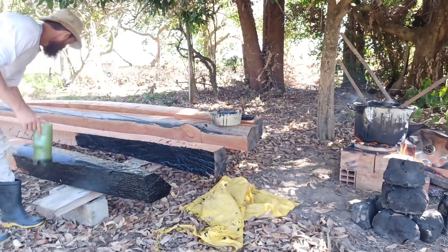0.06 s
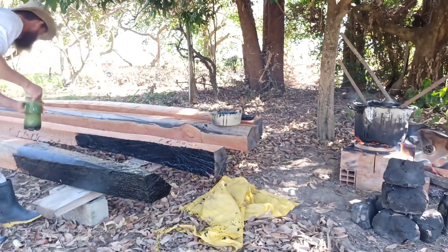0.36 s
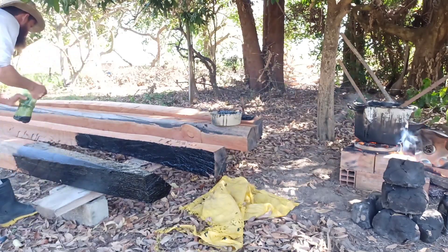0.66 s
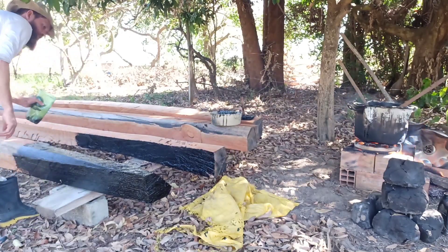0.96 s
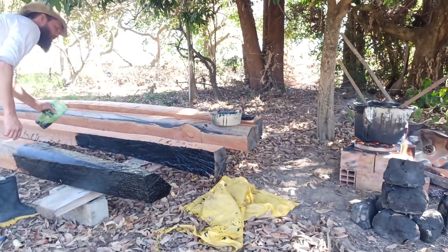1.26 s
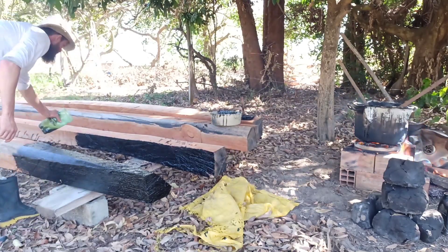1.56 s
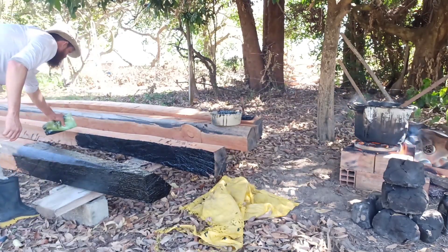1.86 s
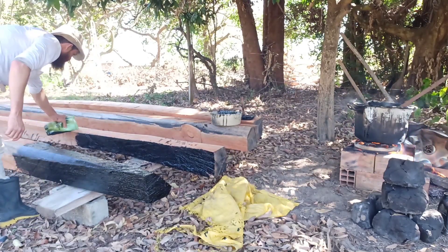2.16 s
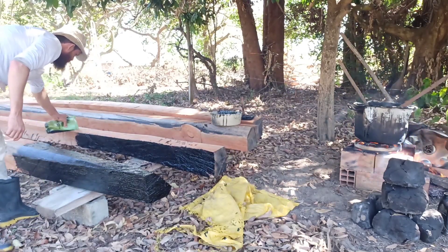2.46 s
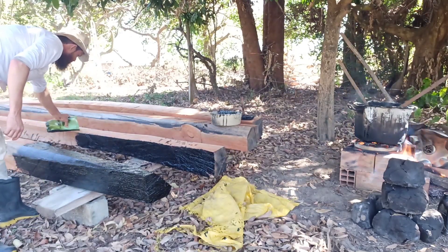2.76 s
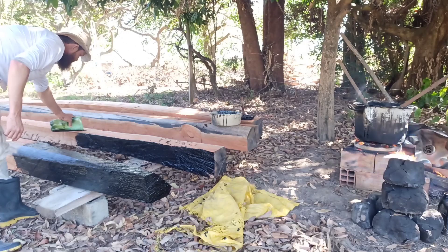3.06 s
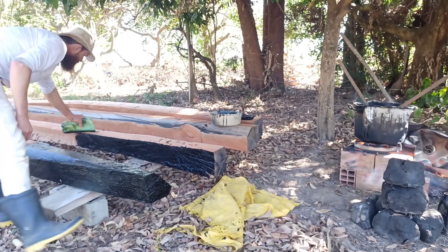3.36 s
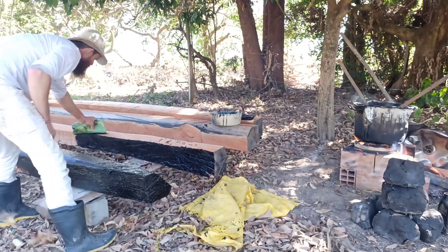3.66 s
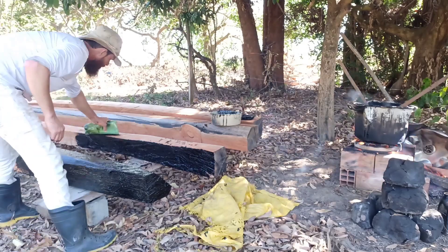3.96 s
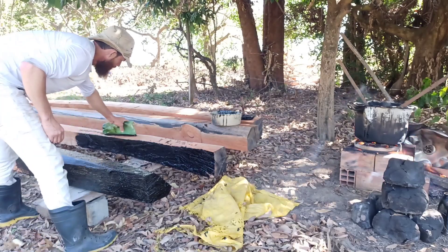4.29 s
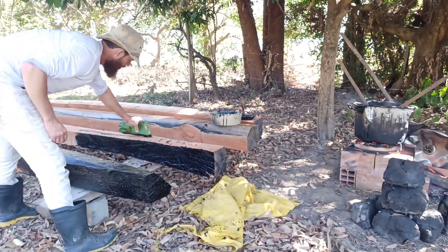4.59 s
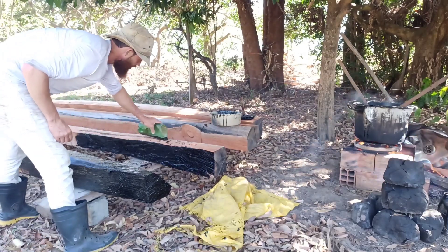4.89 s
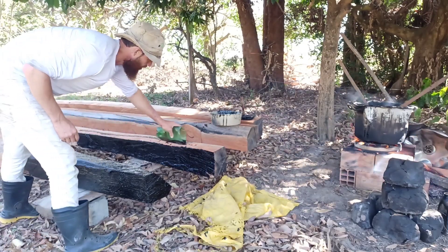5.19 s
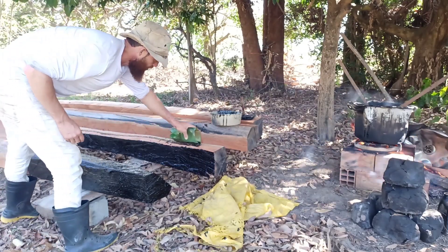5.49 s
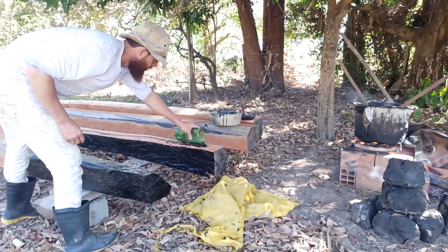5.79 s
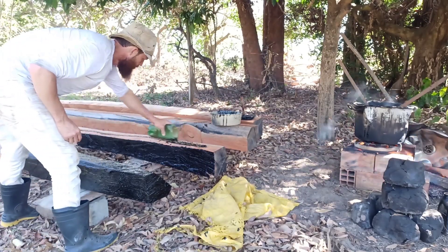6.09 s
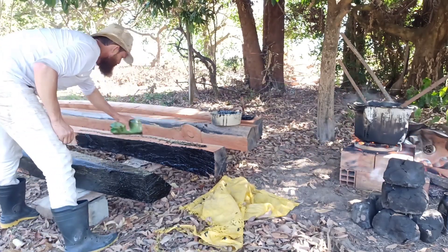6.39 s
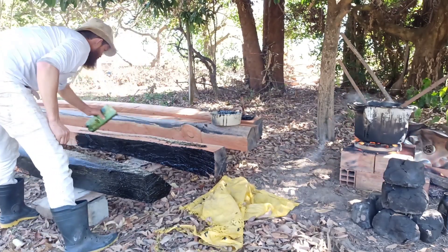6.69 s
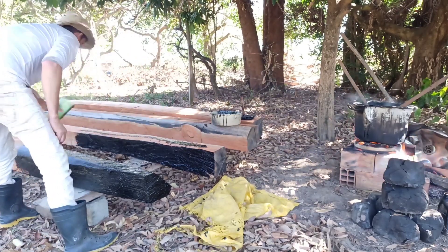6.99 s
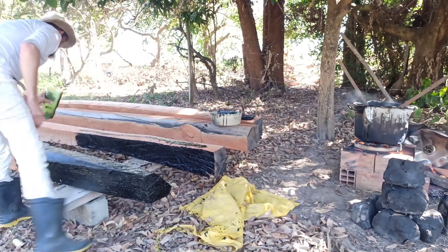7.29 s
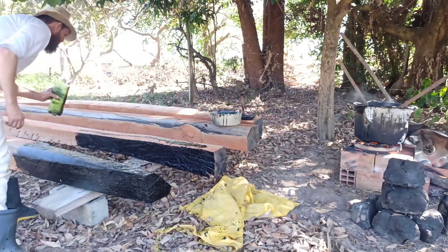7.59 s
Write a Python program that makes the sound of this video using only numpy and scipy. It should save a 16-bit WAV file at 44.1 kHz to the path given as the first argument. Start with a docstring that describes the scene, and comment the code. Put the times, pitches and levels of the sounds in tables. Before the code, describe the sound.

Scattered light knocks and clacks on wooden beams, boots crunching dry leaves, and soft low wind thumps on the microphone outdoors.

```python
"""Knocks, clacks and soft rubbing on wood: a man wipes beams with a hard-backed sponge, under trees.
The sponge's back strikes and rings the beams; its face catches and slips on the grain.
Dry leaves crunch as his boots shift, twigs snap under them, and one thin squeak falls in pitch.
One faint, distant call sounds briefly.
Soft low thumps and short gusts of rumble buffet the microphone over a faint outdoor hiss."""
import sys
import numpy as np
from scipy import signal
from scipy.fft import rfft, irfft
from scipy.io import wavfile
from scipy.ndimage import uniform_filter1d

SR = 44100
rng = np.random.default_rng(int(sys.argv[2]) if len(sys.argv) > 2 else 0)


def output_pcm(signal):
    """Save a mono or channel-first signal as 16-bit PCM at the path in sys.argv[1].

    Samples are clipped to [-1, 1] before scaling.
    """
    pcm = np.clip(np.atleast_2d(signal).T, -1, 1) * 32767
    wavfile.write(sys.argv[1], SR, np.round(pcm).astype(np.int16))


N = 345956
TIME_S = np.arange(N) / SR
HIT_S = TIME_S[:SR // 4]  # time axis of one impact

# Background spectra: freq_hz, gain_db
HISS_EQ = [(20, -29.5), (40, -9.5), (65, -5), (130, -7), (200, -10.5), (380, -14.5), (900, -19.5),
           (2800, -22.5), (4100, -24.5), (5500, -19.5), (7200, -23), (9000, -31.5), (12800, -41),
           (15500, -34)]
SIZZLE_EQ = [(2000, -26), (4500, -9.5), (7000, 15), (10000, -5), (12800, -30), (15400, -2.5)]
RUMBLE_EQ = [(20, -56), (35, -12), (55, -2.5), (80, 10), (130, 5.5), (180, -1.5), (240, -13.5),
             (310, -27.5), (450, -35), (800, -81.5)]
# Gusts on the microphone: start_s, hold_s, level_db
MIC_GUSTS = [(0.017, 0.036, -47), (0.146, 0.033, -53.5), (0.225, 0.081, -51.5), (0.353, .03, -52),
             (0.458, 0.032, -47.5), (0.515, 0.054, -46.5), (0.574, 0.16, -66.5), (0.977, .015, -54.5),
             (1.239, .02, -52), (1.285, 0.18, -67.5), (2.134, 0.055, -63), (2.398, 0.092, -63.5),
             (2.69, 0.022, -53), (2.817, 0.059, -49), (2.91, 0.15, -64), (3.082, 0.17, -60.5),
             (3.505, 0.046, -64), (3.925, .14, -66), (4.196, 0.28, -67.5), (4.555, 0.082, -40),
             (4.661, 0.18, -41.5), (4.917, 0.16, -50), (5.147, 0.029, -38), (5.354, 0.065, -49),
             (5.533, 0.022, -49.5), (5.818, .03, -49.5), (5.933, 0.15, -51), (6.138, 0.027, -48),
             (6.231, 0.29, -43.5), (6.556, 0.11, -45.5), (6.756, 0.12, -46), (6.962, 0.13, -49),
             (7.067, 0.17, -33), (7.265, .042, -30.5), (7.361, 0.07, -42.5), (7.478, 0.064, -31.5),
             (7.59, 0.064, -47.5), (7.704, 0.12, -40.5)]
# Pushes on the microphone: peak_s, level_db, pitch_hz
MIC_THUMPS = [(0.554, -31, 200), (2.178, -49, 230), (3.101, -38, 97), (3.649, -44, 77), (4.575, -25.5, 180),
              (4.597, -27.5, 208), (4.665, -24, 160), (4.772, -32.5, 112), (5.155, -25, 186),
              (5.828, -36, 85.4), (5.974, -34.5, 131), (6.351, -36.5, 224), (6.451, -20.5, 143.6),
              (6.576, -34, 102), (6.648, -40, 320), (6.842, -41, 260), (7.086, -20.5, 184),
              (7.186, -26, 288), (7.217, -19, 148), (7.287, -27, 343), (7.309, -20, 134),
              (7.498, -20.5, 155), (7.528, -32, 300), (7.782, -23.5, 114), (7.791, -32, 366)]

# Boots pressing leaves: peak_s, crunch_db, rise_s, fall_s, crush_relative_db
BOOT_PRESSES = [(0.13, -61.5, 0.061, 0.074, -12), (0.42, -64.5, .35, 0.8, -19),
                (2.396, -46, 0.082, 0.11, -18), (2.597, -39, 0.038, 0.026, -8.5),
                (2.76, -68.5, 0.025, 0.13, -13), (3.11, -62, 0.048, 0.13, -10.5),
                (3.278, -55, 0.019, 0.015, -15.5), (3.644, -39, 0.029, .033, -4.5),
                (3.934, -61, .014, 0.026, -3.5), (7.332, -52.5, 0.072, 0.21, -4.5),
                (7.414, -37, 0.0093, 0.014, -8), (7.475, -36, .035, 0.085, -9.5),
                (7.665, -47.5, 0.091, 0.16, -11.5), (7.73, -44.5, 0.025, 0.013, -7),
                (7.835, -42, 0.036, 0.089, -6.5)]
# Leaves and twigs breaking: start_s, level_db, pitch_hz, fizz_relative_db
STEM_SNAPS = [(0.134, -39.5, 3740, -21), (0.185, -48, 6500, -14), (0.341, -53.5, 7500, -30),
              (0.4354, -47.5, 6800, -32), (0.498, -45.5, 9100, -5), (0.591, -54, 7200, -9),
              (0.7297, -52.5, 4400, -35), (1.6948, -59.5, 4300, -30), (1.908, -58, 5450, -27),
              (2.537, -44, 4200, -24), (2.554, -38, 2800, -17), (2.583, -32, 3820, -15),
              (3.254, -51, 3030, -26), (3.3195, -53.5, 5400, -2), (3.608, -44, 3900, -22),
              (3.6488, -29.5, 3200, -20), (3.6775, -29.5, 4850, -18), (3.782, -53, 3350, -32),
              (3.9235, -50, 6900, -28), (7.273, -37.5, 4300, -30), (7.402, -36, 5300, -27),
              (7.4169, -26, 7470, -25), (7.479, -32, 5870, -20), (7.6703, -32, 5740, -24),
              (7.7887, -36, 5830, -8), (7.81, -32, 4700, -36)]
# Leaf spectra (bright crunch, lower crush, brittle edge ticks): freq_hz, gain_db
CRUNCH_EQ = [(900, -55), (1800, -20), (3000, -11), (4200, -3.5), (5600, 0), (7300, 0), (8700, -8),
             (11000, -14.5), (12800, -27.5), (14000, -17), (15400, -13.5), (16000, -5.5)]
CRUSH_EQ = [(500, -17.5), (900, -11), (1400, -1.5), (2000, 1), (2800, 5), (3600, 5), (5000, -19.5)]
TICK_EQ = [(900, -30), (2000, -4.5), (3800, 0), (6000, 6.5), (9800, 4.5), (12800, -13.5), (15400, -1)]

# Squeak partials: pitch_ratio, gain_db
SQUEAK_TONES = [(0.549, -8), (0.999, 3.5), (1.41, -4)]
# Sponge strokes along the grain: start_s, hold_s, level_db
WIPE_STROKES = [(4.427, 0.017, -67), (4.507, 0.1, -70.5), (5.02, 0.074, -76)]
# Hard edge on wood: start_s, level_db, contact_s, scatter_relative_db
EDGE_CLACKS = [(2.134, -27.5, 0.0069, -12), (5.154, -45.5, 0.0037, -15), (5.38, -42, 0.012, -13.5),
               (5.5957, -22, 0.0022, -9.5), (5.7647, -54.5, 0.0032, -18), (6.358, -55.5, 0.01, -18)]
# Knocks on a beam, plus one faint distant call near 1150 Hz at 5.84 s; three resonances each:
# start_s, low_hz, low_db, mid_hz, mid_db, high_hz, high_db, tail_db
KNOCKS_AND_CALL = [(0.533, 1150, -50.5, 1350, -56, 2600, -80, -62),
                   (0.543, 360, -54.5, 1230, -62, 1600, -81, -66.5),
                   (0.688, 494, -55.5, 1290, -65, 2300, -84, -66),
                   (1.4398, 528, -44.5, 1340, -32, 3860, -37.5, -55),
                   (1.442, 800, -47, 2360, -40, 5400, -49.5, -58),
                   (2.1398, 700, -44.5, 1180, -31.5, 3380, -32, -47.5),
                   (2.141, 1380, -59, 1626, -34.5, 2600, -48, -49),
                   (2.258, 900, -55, 1890, -39, 2360, -52, -50),
                   (5.1514, 1440, -48, 1950, -46, 3180, -74, -68),
                   (5.38, 1270, -49.5, 1650, -46, 3200, -42, -72),
                   (5.5938, 1175, -39, 1854, -42, 3400, -47, -70),
                   (5.836, 740, -66, 1150, -64, 2650, -81, -66.5),
                   (6.385, 525, -45, 1270, -39, 3080, -54, -54.5),
                   (6.4763, 1060, -47, 1800, -45, 2740, -51, -58),
                   (6.625, 660, -42, 1740, -30, 3600, -41.5, -52),
                   (6.6259, 700, -57, 1730, -48, 2530, -40.5, -63),
                   (6.645, 654, -44, 1420, -57, 2300, -54, -53.5),
                   (7.0806, 943, -40, 1570, -44.5, 3170, -46.5, -46.5)]
# Beam modes: freq_hz, gain_db, decay_s
BEAM_MODES = [(388.6, 3.5, 0.02), (454, -3.5, 0.0074), (615, -2, 0.021), (763, -6, 0.027), (960, -7, .014),
              (1047, 11, 0.012), (1186, 1, 0.0099), (1325, 3, 0.013), (1620, -19, 0.015), (1825, -5, 0.02),
              (2090, -18, 0.0063), (2380, 12.5, 0.0038)]
# Spectra of sponge contacts and their scatter from the surroundings: freq_hz, gain_db
WIPE_EQ = [(400, -14), (950, 0.5), (1700, 0), (2200, -9), (2750, 5), (3600, -4), (6000, -15), (11000, -50)]
CLACK_EQ = [(530, -31), (900, -27), (1950, -5), (2600, -4), (3510, -10.5), (4050, -8), (6890, 2.5),
            (8050, -6), (9420, -16.5), (10400, -11.5), (12900, -25), (15100, -20), (16000, -17)]
CLACK_SCATTER_EQ = [(410, -51), (700, -19.5), (1200, -55), (1400, -23), (1710, -16), (2130, -15.5),
                    (2920, -5), (4150, -2), (6150, 6.5), (7490, 5), (12800, -29), (16000, -17)]
KNOCK_SCATTER_EQ = [(250, -40), (450, 1.5), (1200, -3.5), (2000, -2.5), (3500, -5.5), (5000, -8.5),
                    (7000, -24), (10000, -50)]


def undb(db):
    """Decibels to gain."""
    return 10 ** (np.asarray(db) / 20)


def unit_rms(x):
    """Scale to rms 1."""
    return x / np.sqrt(np.mean(x ** 2))


def unit_peak_rms(x):
    """Scale the loudest 4 ms to rms 1."""
    return x / np.sqrt(uniform_filter1d(x ** 2, 176).max())


def add(out, start_s, x):
    """Mix x into out from start_s."""
    i = max(int(start_s * SR), 0)
    out[i:i + len(x)] += x[:max(len(out) - i, 0)]


def colour(x, eq):
    """Minimum-phase filter through (freq_hz, gain_db) points."""
    hz, db = np.transpose(eq)
    size = 8192
    log_hz = np.log(np.maximum(np.fft.rfftfreq(size, 1 / SR), 1))
    cepstrum = irfft(np.log(undb(np.interp(log_hz, np.log(hz), db))))
    cepstrum[1:size // 2] *= 2
    cepstrum[size // 2 + 1:] = 0
    return signal.fftconvolve(x, irfft(np.exp(rfft(cepstrum))))[:len(x)]


def ring(x, hz, width_hz, stages=1):
    """Cascade of equal resonators, gain 1 at centre."""
    for _ in range(stages):
        x = signal.lfilter(*signal.iirpeak(hz, hz / width_hz, fs=SR), x)
    return x


def resonance(push, hz, width_hz):
    """Short normalised resonance with steep skirts."""
    for band_hz in (width_hz, hz / 2, hz):
        push = ring(push, hz, band_hz)
    return unit_peak_rms(push)


def wander(rate_hz):
    """Random steps, smoothed twice; rms 1."""
    hold = max(int(SR / rate_hz), 1)
    steps = np.repeat(rng.standard_normal(N // hold + 1), hold)
    return unit_rms(uniform_filter1d(uniform_filter1d(steps, hold), hold)[:N])


def envelope(start_s, attack_s, hold_s, release_s):
    """Linear rise; exponential decay from hold_s after the start."""
    age_s = TIME_S - start_s
    return np.clip(age_s / attack_s, 0, 1) * np.exp(-np.maximum(age_s - hold_s, 0) / release_s)


def burst(decay_s):
    """Decaying noise."""
    return rng.standard_normal(len(HIT_S)) * np.exp(-HIT_S / decay_s)


def crackle(rate_hz, spread_db):
    """Random impulses: most weak, a few strong."""
    strength = undb(spread_db * np.minimum(rng.exponential(size=N), 4))
    fires = rng.random(N) < rate_hz / SR
    return unit_rms(fires * strength * rng.choice([-1, 1], N))


def crinkles(rate_hz, spread_db, decay_cycles, samples=700):
    """Leaf crinkles: damped sines of random onset, pitch and strength."""
    draws = rng.random((int(rate_hz * N / SR), 3))
    onset = (draws[:, :1] * (N - samples)).astype(int)
    hz = 900 + 15000 * draws[:, 1:2] ** 2
    strength = undb(-spread_db * np.log(np.maximum(draws[:, 2:], 0.03)))
    strength *= hz ** 0.75  # high crinkles are shorter and need more swing
    cycles = hz * HIT_S[:samples]
    waves = strength * np.exp(-cycles / decay_cycles) * np.sin(2 * np.pi * cycles)
    return unit_rms(np.bincount((onset + np.arange(samples)).ravel(), waves.ravel(), N))


def air(level_db=-69.5, flicker_db=1.54, tick_db=-15, swell_at_s=4.13, swell_width_s=0.72):
    """Hiss and ticks of stirring foliage swell once; a fine sizzle fades to a steady floor."""
    hiss = unit_rms(colour(rng.standard_normal(N), HISS_EQ)) * undb(flicker_db * wander(5.45))
    ticks = unit_rms(colour(crinkles(rate_hz=25, spread_db=1.5, decay_cycles=30), HISS_EQ))
    fade = undb(-79.5) + undb(-73) * np.exp(-TIME_S / 0.59)
    sizzle = unit_rms(colour(crackle(rate_hz=5500, spread_db=6.2), SIZZLE_EQ)) * fade
    swell_db = 3 * np.exp(-((TIME_S - swell_at_s) / swell_width_s) ** 2)
    return (hiss + undb(tick_db) * ticks) * undb(level_db + swell_db) + sizzle


def turbulence(hz, width_hz):
    """Narrow band of wind noise."""
    return unit_rms(ring(rng.standard_normal(N), hz, width_hz, stages=4))


def rumble(breeze_db=-79, knee_db=-35, bass_db=-2, flutter_db=-6, rasp_db=-16, bump_db=3.5):
    """Gusts buffet the microphone; strong ones saturate in the bass and flutter higher up."""
    bass = colour(rng.standard_normal(N), RUMBLE_EQ)
    bass /= np.sqrt(uniform_filter1d(bass ** 2, size=1200))
    gusts = sum(undb(db) * envelope(start_s, 0.011, hold_s, 0.011) for start_s, hold_s, db in MIC_GUSTS)
    force = (gusts + undb(breeze_db)) / undb(knee_db)
    strain = np.tanh(force)
    flutter = undb(flutter_db) * turbulence(hz=225, width_hz=161)
    rasp = undb(rasp_db) * np.minimum(force, 2) * strain * turbulence(hz=385, width_hz=230)
    buffet = undb(bass_db) * bass + strain ** 1.74 * (flutter + rasp)
    return undb(knee_db + bump_db * wander(55)) * strain * buffet


def thumps(decay_cycles=0.44, lead_s=0.05, highpass_hz=58):
    """Soft pushes rock the microphone for a cycle or two."""
    out = np.zeros(N)
    for peak_s, db, hz in MIC_THUMPS:
        cycles = (HIT_S - lead_s) * hz
        swell = np.where(cycles < 0, np.exp(-(2 * cycles) ** 2), np.exp(-np.abs(cycles) / decay_cycles))
        lowpass = signal.butter(3, 2 * hz, fs=SR, output="sos")
        push = signal.sosfiltfilt(lowpass, swell * np.cos(2 * np.pi * cycles))
        add(out, peak_s - lead_s, undb(db) * push)
    return signal.sosfilt(signal.butter(3, highpass_hz, "highpass", fs=SR, output="sos"), out)


def rustle(eq, dust_db=-3, scatter_db=-25, scatter_s=0.0071):
    """Crinkles and finer fractures, smeared by reflections in the leaf litter."""
    grains = crinkles(rate_hz=3600, spread_db=2.7, decay_cycles=3, samples=150)
    litter = undb(scatter_db) * burst(scatter_s)
    litter[0] += 1  # direct path
    fractures = grains + undb(dust_db) * crackle(rate_hz=4000, spread_db=5.2)
    return unit_rms(colour(signal.fftconvolve(fractures, litter)[:N], eq))


def leaves(surge_db=2, crush_gain_db=-1, tick_db=-42, tick_exponent=0.49):
    """Dry leaves crunch under a boot; weight adds a lower crush; lone ticks stand out at light load."""
    breaking, weight = np.zeros(N), np.zeros(N)
    for peak_s, crunch_db, rise_s, fall_s, crush_db in BOOT_PRESSES:
        age_s = TIME_S - peak_s
        load = undb(crunch_db) * np.exp(-np.where(age_s < 0, (age_s / rise_s) ** 2, age_s / fall_s))
        breaking += load
        weight += undb(crush_db) * load
    crunch = rustle(CRUNCH_EQ) * breaking
    crush = undb(crush_gain_db) * rustle(CRUSH_EQ) * weight
    edges = signal.fftconvolve(crackle(rate_hz=55, spread_db=2.3), burst(0.0015))[:N]
    ticks = undb(tick_db) * unit_rms(colour(edges, TICK_EQ)) * breaking ** tick_exponent
    return (crunch + crush) * undb(surge_db * wander(110)) + ticks


def snaps(break_s=0.0028, tail_s=0.019, tail_db=-20, crush_db=-8, stem_db=-2, gain_db=-3):
    """Single stems break: a sharp, slightly pitched tick with a faint leafy tail."""
    out = np.zeros(N)
    for start_s, db, hz, fizz_db in STEM_SNAPS:
        tick = burst(break_s) + undb(tail_db) * burst(tail_s)
        crunch = unit_peak_rms(colour(tick, CRUNCH_EQ))
        crush = undb(crush_db) * unit_peak_rms(colour(tick, CRUSH_EQ))
        stem = undb(stem_db) * resonance(tick, hz, width_hz=450)
        fizz = undb(fizz_db) * unit_peak_rms(ring(tick, hz=15000, width_hz=2200, stages=2))
        add(out, start_s, undb(db + gain_db) * (crunch + crush + stem + fizz))
    return out


def squeak(start_s=2.83, pitch_hz=3750, fall_oct_per_s=3.5, level_db=-64, rough_db=3.8):
    """Brief, rough, falling squeak of three inharmonic partials."""
    hz = pitch_hz * 2 ** (-fall_oct_per_s * np.maximum(TIME_S - start_s, 0))
    cycles = np.cumsum(hz * (1 + 0.07 * wander(4000))) / SR
    tone = sum(undb(db) * np.sin(2 * np.pi * ratio * cycles) for ratio, db in SQUEAK_TONES)
    shape = envelope(start_s, attack_s=0.0043, hold_s=0.026, release_s=0.033)
    return undb(level_db + rough_db * wander(170)) * shape * tone


def wipes(attack_s=0.0091, release_s=0.012, uneven_db=3):
    """The sponge catches and slips on wood fibres."""
    strokes = sum(undb(db) * envelope(start_s, attack_s, hold_s, release_s)
                  for start_s, hold_s, db in WIPE_STROKES)
    friction = unit_rms(colour(crackle(rate_hz=1500, spread_db=3.4), WIPE_EQ))
    return friction * strokes * undb(uneven_db * wander(70))


def clacks(crack_gain_db=-2, scatter_s=0.02, delay_s=0.005):
    """A hard edge chatters on the wood; the surroundings return a bright tail."""
    out = np.zeros(N)
    for start_s, db, contact_s, scatter_db in EDGE_CLACKS:
        crack = unit_peak_rms(colour(burst(contact_s), CLACK_EQ))
        tail = unit_peak_rms(colour(burst(scatter_s), CLACK_SCATTER_EQ))
        add(out, start_s, undb(db + crack_gain_db) * crack)
        add(out, start_s + delay_s, undb(db + scatter_db) * tail)
    return out


def beam_ring(spread_db=10, detune_ratio=0.0094, attack_s=0.0042):
    """Damped beam modes; tuning, strength and phase vary per strike."""
    hz, db, decay_s = np.array(BEAM_MODES).T[:, :, None]
    detune, strength, phase = rng.standard_normal((3, len(BEAM_MODES), 1))
    cycles = hz * (1 + detune_ratio * detune) * HIT_S + phase
    modes = undb(db + spread_db * strength) * np.exp(-HIT_S / decay_s) * np.sin(2 * np.pi * cycles)
    return unit_peak_rms(modes.sum(axis=0) * (1 - np.exp(-HIT_S / attack_s)))


def knocks_and_call(contact_s=0.0063, grit=0.051, ring_db=-2, scatter_db=-3, scatter_s=0.02):
    """Gritty knocks ring a beam and scatter off ground and trunks; the faint call is built alike."""
    out = np.zeros(N)
    for start_s, low_hz, low_db, mid_hz, mid_db, high_hz, high_db, tail_db in KNOCKS_AND_CALL:
        push = grit * burst(contact_s)
        push[0] += 1  # impulse
        low = undb(low_db) * resonance(push, low_hz, width_hz=120)
        mid = undb(mid_db) * resonance(push, mid_hz, width_hz=180)
        high = undb(high_db) * resonance(push, high_hz, width_hz=650)
        scatter = undb(scatter_db) * unit_peak_rms(colour(burst(scatter_s), KNOCK_SCATTER_EQ))
        tail = undb(ring_db) * beam_ring() + scatter
        add(out, start_s, low + mid + high + undb(tail_db) * tail)
    return out


def scene():
    """Mono mix at one microphone."""
    foreground = knocks_and_call() + clacks() + wipes() + squeak()
    ground = leaves() + snaps()
    return (foreground + ground + thumps() + rumble() + air())[None]


def record(dry):
    """Steep low-pass at 15.9 kHz."""
    return signal.sosfilt(signal.ellip(10, 0.2, 70, 15900, fs=SR, output="sos"), dry)


dry = scene()
out = record(dry)
output_pcm(out)
```